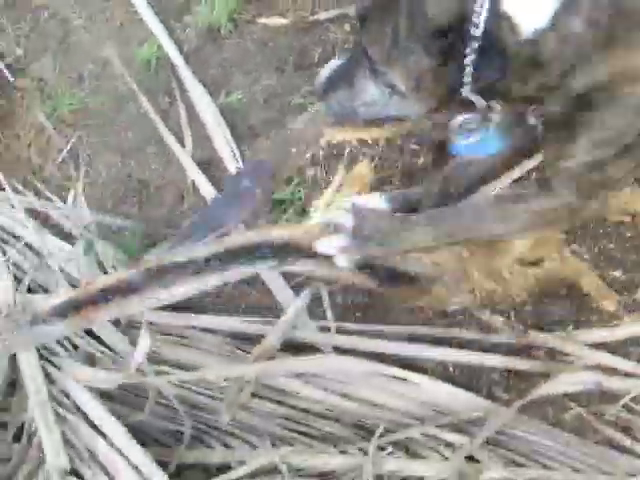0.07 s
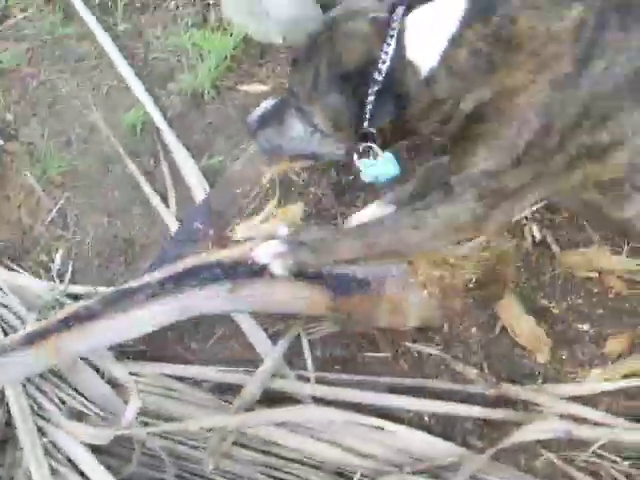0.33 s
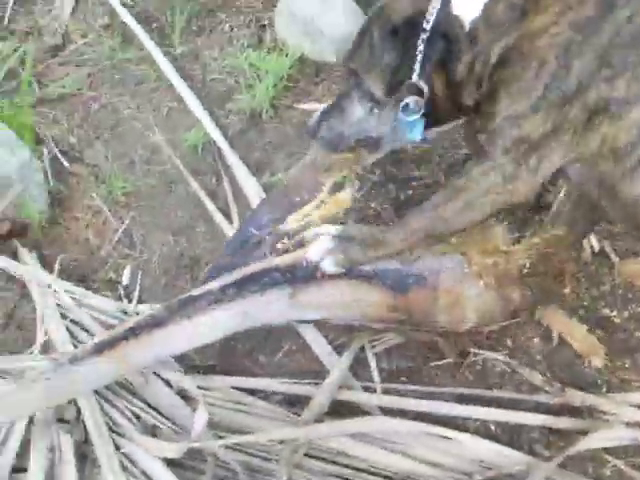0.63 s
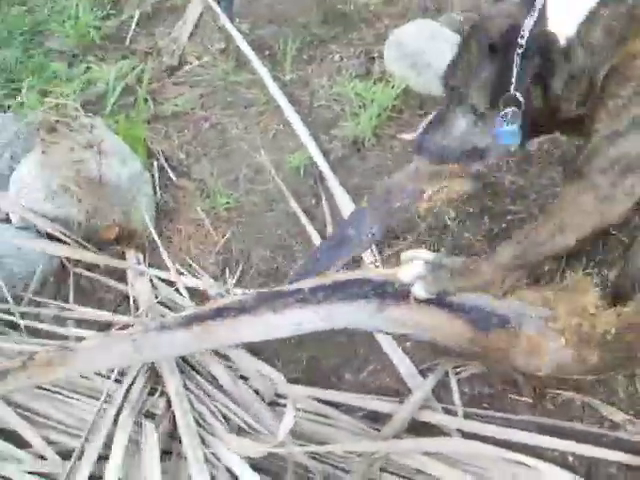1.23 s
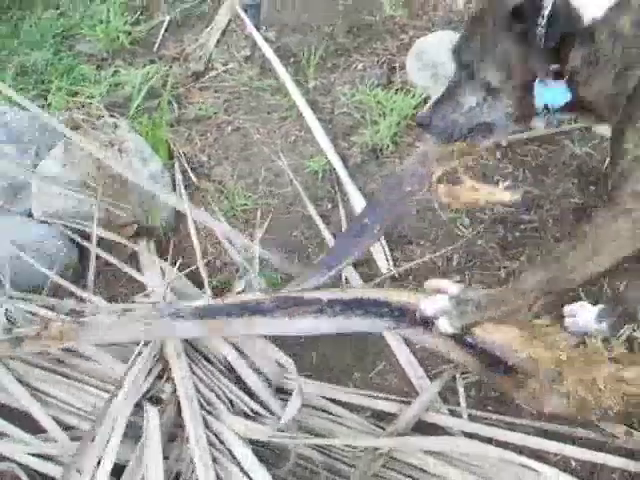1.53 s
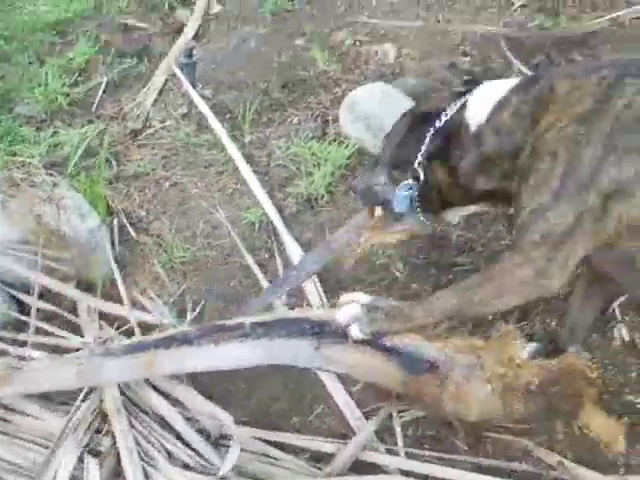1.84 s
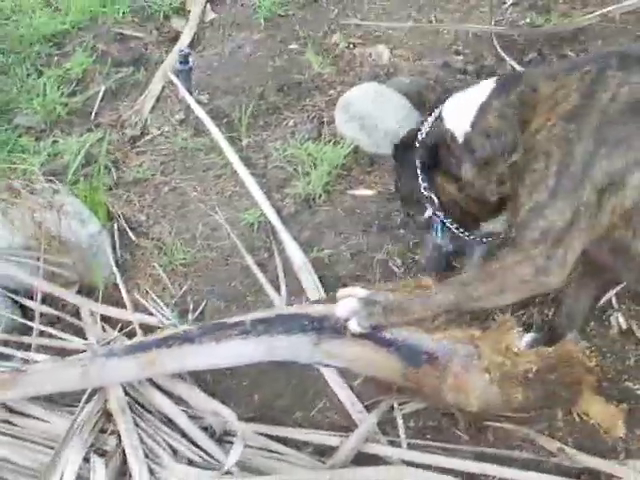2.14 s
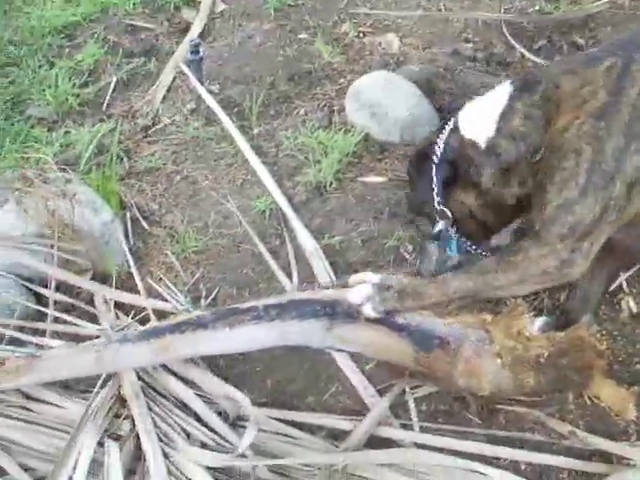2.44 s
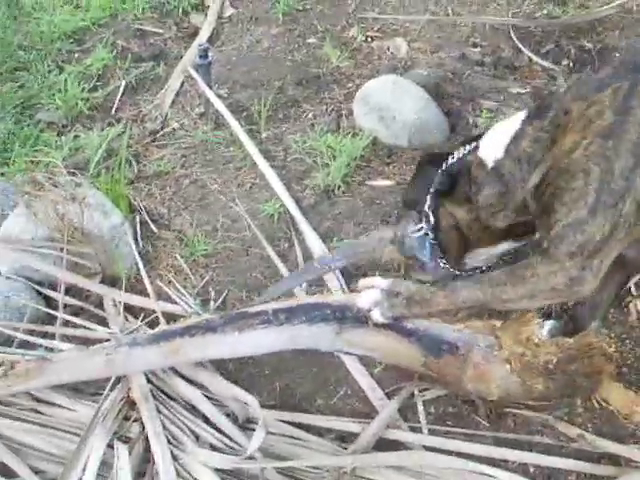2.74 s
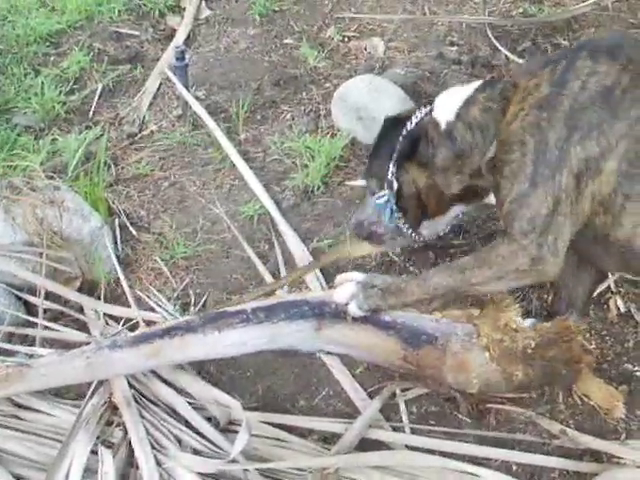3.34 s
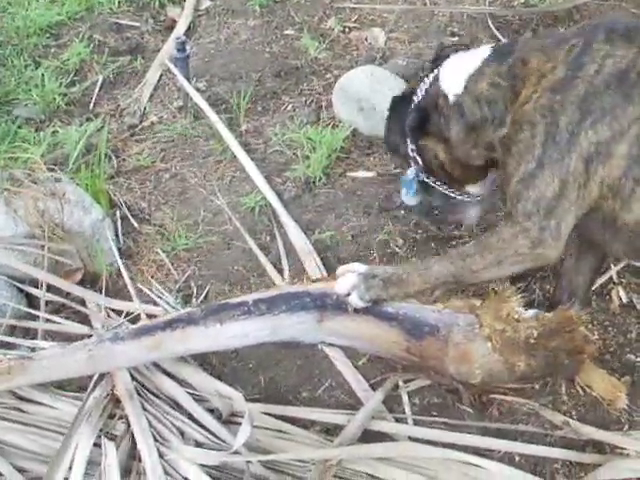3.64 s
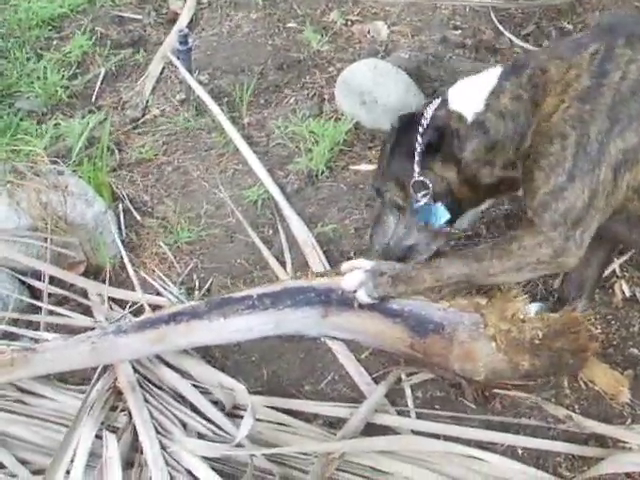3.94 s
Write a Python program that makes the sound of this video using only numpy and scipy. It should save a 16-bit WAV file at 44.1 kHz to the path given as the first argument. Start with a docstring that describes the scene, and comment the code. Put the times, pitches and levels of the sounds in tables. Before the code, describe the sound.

A dry palm frond rustles, crunches and snaps close up as a dog tugs it, with dull thuds and chain collar clinks. Strips rip off at about 0.9 and 1.4 seconds. From 2 seconds it is quieter, with sparse ticks and clinks over a distant outdoor hum. Faint birds call, one chirping near 3.1 seconds. Brief rustling and a sharp tick come around 3.5 seconds.

```python
"""Dry leaflets rustle and fibres crunch and snap, close up, as a dog tugs a palm frond over bare earth.
Two long strips rip off the stalk in dense runs of tiny fractures. Teeth and collar tick, the chain's
steel links ring and the scuffle thuds dully. Later a bird chirps once, with faint calls further off,
over a distant outdoor hum. One close microphone with a narrow band, the same in both channels."""
import sys
import numpy as np
from scipy import signal
from scipy.fft import rfft, irfft, next_fast_len
from scipy.io import wavfile
from scipy.ndimage import map_coordinates

SR = 44100
rng = np.random.default_rng(int(sys.argv[2]) if len(sys.argv) > 2 else 0)


def wrap_up_sound(samples):
    """Save the sound to the file named by the first command line argument, as 16-bit audio."""
    columns = np.atleast_2d(samples).T
    # keep every value between -1 and 1, then stretch to whole-number steps
    tamed = np.clip(columns, -1, 1)
    steps = np.round(tamed * 32767).astype(np.int16)
    wavfile.write(sys.argv[1], SR, steps)


N = 176400

# strips tearing off, one curve each (time [s], relative level [dB])
STRIP_RIPS = [
    [(.77, -42.5), (.826, -32), (.842, -25), (.89, -21), (.948, -24), (.958, -33), (1.0, -34)],
    [(1.36, -42.5), (1.415, -31.5), (1.44, -20), (1.46, -27), (1.485, -21.5), (1.505, -32), (1.54, -36)],
]
# leaflets dragging over the earth (time [s], level [dB])
LEAFLET_DRAG = [(0, -36.5), (.05, -36), (.16, -31), (.27, -34), (.31, -41.5), (.47, -39), (.66, -45),
                (.735, -40), (.8, -36.5), (1.0, -36.5), (1.19, -34.5), (1.24, -43), (1.32, -46.5),
                (1.4, -39), (1.54, -36.5), (1.67, -36), (1.96, -53), (2.97, -55.5), (3.18, -45.5),
                (3.48, -50), (3.55, -40), (3.73, -51), (4, -53.5)]
# bunches of fibres giving way (time [s], level [dB], hold [s])
BUNCH_BREAKS = [(0.027, -31, 0.0013), (0.053, -33, 0.017), (0.093, -28.5, 0.0066), (0.139, -29.5, 0.027),
                (0.177, -35.5, 0.004), (0.232, -35, 0.038), (0.88, -20.5, 0.0053), (1.063, -34, 0.011),
                (1.096, -38, 0.0053), (1.146, -29.5, 0.006), (1.177, -33.5, 0.009)]
# thick fibres snapping (time [s], relative level [dB], low ring [Hz], high ring [Hz])
FIBRE_SNAPS = [(0.0168, -18.5, 1480, 3000), (0.1125, -16.5, 3270, 5100), (0.477, -18.5, 2210, 4100),
               (0.5102, -24, 2110, 4540), (.617, -26, 1970, 3800), (0.7146, -28.5, 1950, 3240),
               (1.1477, -24, 2400, 5800), (3.2938, -29, 2910, 4780)]
# dry ticks of teeth and collar (time [s], relative level [dB])
HARD_TICKS = [(.096, -23.5), (0.37, -24.5), (.4402, -23.5), (0.7479, -21.5), (0.951, -14), (1.0982, -13),
              (1.2704, -25.5), (1.82, -28), (2.115, -27), (3.4358, -27), (3.5397, -15)]
# chain links touching, and at 3.812 s the tag's high overtone (time [s], level [dB], pitch [Hz])
COLLAR_RINGS = [(0.3281, -20.5, 6835), (0.45, -41, 6880), (0.537, -33, 7170), (0.578, -39, 6850),
                (0.613, -41.5, 6830), (0.706, -42, 6870), (1.258, -34, 6960), (2.494, -44.5, 7000),
                (2.812, -49, 6880), (3.041, -50, 6900), (3.51, -40, 7000), (3.812, -42, 7500),
                (3.89, -54, 6900), (3.969, -52, 7040)]
# the tag knocking on its ring (time [s], level [dB])
TAG_HITS = [(0.636, -29), (3.813, -40)]
# the stalk hitting the ground (time [s], level [dB])
STALK_KNOCKS = [(.12, -29.5), (.155, -41)]
# thuds of the scuffle (time [s], level [dB], pitch [Hz])
SCUFFLE_THUDS = [(0.181, -33, 92.5), (0.277, -35, 55), (.418, -33.5, 103), (.51, -34, 75.6),
                 (0.546, -30, 94.4), (.612, -30.5, 62), (.69, -31, 69), (0.743, -34, 95.5),
                 (0.936, -41, 74), (3.951, -39, 65)]
# low rumble at the microphone (time [s], level [dB])
RUMBLE_LEVEL = [(0, -60), (.55, -41), (1.05, -51.5), (2.1, -65.5), (3.4, -53), (4, -43.5)]
# the bird's falling note (time [s], pitch [Hz], level [dB])
BIRD_CHIRP = [(3.096, 5250, -58), (3.112, 5380, -49), (3.126, 5250, -42.5), (3.141, 4780, -43),
              (3.157, 4080, -47), (3.17, 3950, -53)]
# far-off calls (time [s], pitch [Hz], hold [s])
FAR_CALLS = [(2.73, 2600, 0.031), (2.795, 2570, 0.02), (3.681, 1724, 0.081)]
# colour of the tearing stalk (frequency [Hz], relative level [dB])
STALK_COLOUR = [(100, -15.5), (650, -15), (1200, -11), (1750, -3.5), (2300, -6), (3000, -3.5), (3700, -4.5),
                (6000, 0), (7000, -2.5), (8000, -4)]
# colour of scraping leaflets (frequency [Hz], relative level [dB])
LEAFLET_COLOUR = [(100, -26.5), (300, -8.5), (600, -9), (950, -4), (2100, 1), (3600, -0.5), (4600, 1.5),
                  (8000, 0.5)]
# colour of a breaking bunch (frequency [Hz], relative level [dB])
BUNCH_COLOUR = [(150, -16.5), (1000, -7), (2200, 2.5), (3500, -4), (6300, 4.5)]
# colour of a fibre's crack (frequency [Hz], relative level [dB])
CRACK_COLOUR = [(150, -22.5), (900, 0.5), (6000, 2.5), (10000, -29.0)]
# colour of the rumble (frequency [Hz], relative level [dB])
RUMBLE_COLOUR = [(25, 5.5), (58, 1.5), (110, -1), (200, -19.5), (1500, -81)]
# colour of the distant hum (frequency [Hz], relative level [dB])
HUM_COLOUR = [(40, 13.5), (170, -2.5), (290, 2), (550, -3), (900, 2.5), (1700, 0.5), (3300, -9),
              (8000, -15)]
# the microphone's treble roll-off (frequency [Hz], gain [dB])
MIC_RESPONSE = [(6900, 0), (7450, -7.5), (7950, -19), (8300, -32)]
TOP_HZ = 8250  # upper edge of the microphone's band


def rips():
    """Close to the microphone, each strip peels off the stalk in a dense run of fractures."""
    grain = fibres(count=30000, spread_db=2.5, ring_s=.0004) * amp(.8 * wobble(330))
    return amp(-1) * sum(level(rip) for rip in STRIP_RIPS) * unit(coloured(grain, STALK_COLOUR))


def rustle():
    """Leaflets scrape over each other: crackle on a soft hiss, catching and slipping."""
    grain = fibres(count=9000, spread_db=4.3, ring_s=.0003) + noise()
    catch = amp(1.5 * wobble(150))
    return level(LEAFLET_DRAG) * unit(coloured(grain * catch, LEAFLET_COLOUR))


def crunches():
    """Small bunches of fibres break together."""
    grain = fibres(count=20000, spread_db=3, ring_s=.0003) * amp(1.5 * wobble(500))
    force = sum(amp(db) * burst(s, attack=.00053, hold=hold, t60=.033) for s, db, hold in BUNCH_BREAKS)
    return force * unit(coloured(grain, BUNCH_COLOUR))


def snaps():
    """A thick fibre cracks, rings at two pitches for a moment, cracks again and splinters."""
    out = np.zeros(N)
    crack = amp(-3.5) * unit(coloured(noise(), CRACK_COLOUR))
    for s, db, low_hz, high_hz in FIBRE_SNAPS:
        ring = tone(s, low_hz) + tone(s, high_hz)
        snap = (ring + crack) * burst(s, attack=.0004, hold=.0013, t60=.006)
        splinters = crack * burst(s + .0028, attack=.00033, hold=.0011, t60=.0086)
        out += amp(db - 5.5) * (snap + splinters)
    return out


def ticks():
    """Teeth and collar tick: one hard contact, then a brief spray of splinters."""
    out = np.zeros(N)
    for s, db in HARD_TICKS:
        out[round(s * SR)] += amp(db + 11.5)
        out += amp(db - 2.5) * burst(s, attack=.0001, hold=0, t60=.017) * noise()
    return filtered(out, lambda hz: (hz < TOP_HZ) * 1j * hz / (3000 + 1j * hz))  # thin below 3 kHz


def collar():
    """Damped steel links ring high and set the chain shivering; the tag clinks, once with an overtone."""
    out = np.zeros(N)
    chain = noise_band(centre_hz=6880, half_width_hz=120)
    for s, db, hz in COLLAR_RINGS:
        ring = amp(db) * tone(s, hz) * burst(s, attack=.0004, hold=.0015, t60=.067)
        shiver = amp(db / 2 - 33.5) * chain * burst(s, attack=.003, hold=.021, t60=.13)
        out += ring + shiver
    for s, db in TAG_HITS:
        out += amp(db) * tone(s, hz=3744) * burst(s, attack=.0006, hold=.002, t60=.028)
    return out


def knocks():
    """The hollow stalk bumps the ground and bounces once, ringing in two modes."""
    return sum(amp(db) * tone(s, hz) * burst(s, attack=.0021, hold=0, t60=.044)
               for s, db in STALK_KNOCKS for hz in (222, 385))


def thuds():
    """The scuffle bumps for a cycle or two at a time, with a scuff above, over an uneven low rumble."""
    out = level(RUMBLE_LEVEL) * unit(coloured(noise(), RUMBLE_COLOUR))
    for s, db, hz in SCUFFLE_THUDS:
        scuff = amp(-10.5) * noise_band(centre_hz=155, half_width_hz=55)
        out += amp(db) * (tone(s, hz) + scuff) * burst(s, attack=.006, hold=1.1 / hz, t60=.066)
    return out


def bird(far_db=-52, sag_hz_per_s=900):
    """One thin, falling chirp, and three faint whistles further off that sag as they sound."""
    s, hz, db = np.transpose(BIRD_CHIRP)
    waver = 1 + .016 * wobble(660)
    out = level(np.transpose([s, db])) * whistle(np.interp(clock(), s, hz) * waver)
    for s, hz, hold in FAR_CALLS:
        pitch = hz - sag_hz_per_s * np.clip(clock() - s - hold / 2, -hold, hold)
        out += amp(far_db) * burst(s, attack=.01, hold=hold, t60=.059) * whistle(pitch * waver)
    return out


def yard(x):
    """The direct sound, then a faint short scatter from ground and stones."""
    tail = noise() * burst(.0036, attack=.00067, hold=0, t60=.12)
    return x + amp(-15) * signal.fftconvolve(x, tail / np.linalg.norm(tail))[:N]


def distant_hum():
    """The outdoors hums far behind the dog, almost steady."""
    return amp(-48 + .27 * wobble(6.99)) * unit(coloured(noise(), HUM_COLOUR))


def fibres(count, spread_db, ring_s):
    """Tiny fractures, each a brief ring at its own pitch; rms 1."""
    when, pitch, size, phase = rng.random((count, 4)).T
    t = np.arange(SR // 300) / SR
    hz = pitch[:, None] * TOP_HZ
    gain = amp(spread_db * -np.log(1 - .98 * size))  # many weak, a few strong
    grains = gain[:, None] * np.sin(2 * np.pi * (hz * t + phase[:, None])) * np.exp(-t / ring_s)
    at = (when * N).astype(int)[:, None] + np.arange(len(t))
    return unit(np.bincount(at.ravel(), grains.ravel(), N)[:N])


def amp(db):
    """Decibels to gain."""
    return 10 ** (np.asarray(db) / 20)


def unit(x):
    """Scale to rms 1."""
    return x / np.sqrt(np.mean(x ** 2) + 1e-20)


def clock():
    """Time of each sample in seconds."""
    return np.arange(N) / SR


def level(rows):
    """Gain per sample from (time [s], level [dB]) rows, silent outside them."""
    s, db = np.transpose(rows)
    return amp(np.interp(clock(), s, db, left=-120, right=-120))


def wobble(rate):
    """A smooth random curve, rate knots a second."""
    return map_coordinates(rng.standard_normal(4096), [clock() * rate], mode="wrap")


def burst(s, attack, hold, t60):
    """Envelope that rises at s, holds, then falls 60 dB in t60; all in seconds."""
    t = np.maximum(clock() - s, 0)
    decay = np.log(1000) * np.maximum(t - hold, 0) / t60
    return (1 - np.exp(-t / attack)) * np.exp(-np.minimum(decay, 20))


def tone(s, hz):
    """A sine with zero phase at time s."""
    return np.sin(2 * np.pi * hz * (clock() - s))


def whistle(hz):
    """A sine that follows a pitch curve."""
    return np.sin(2 * np.pi * np.cumsum(hz) / SR)


def noise():
    """White noise."""
    return rng.standard_normal(N)


def noise_band(centre_hz, half_width_hz):
    """Noise around one resonance; rms 1."""
    return unit(filtered(noise(), lambda hz: 1 / (1 + ((hz - centre_hz) / half_width_hz) ** 2)))


def filtered(x, response):
    """x through a frequency response."""
    size = next_fast_len(N + SR // 4)
    return irfft(rfft(x, size) * response(np.fft.rfftfreq(size, 1 / SR)), size)[:N]


def coloured(x, points):
    """x through (frequency [Hz], gain [dB]) points on a log frequency axis."""
    f, db = np.transpose(points)
    return filtered(x, lambda hz: amp(np.interp(np.log(hz + 1), np.log(f), db)))


def scene():
    """Dog and frond up close, bird and hum beyond, all into one microphone."""
    bright = rustle() + rips() + crunches() + snaps() + ticks() + collar() + bird()
    mono = yard(bright) + knocks() + thuds() + distant_hum()
    return np.array([mono, mono])


def record(dry):
    """The microphone rolls off the treble and keeps nothing above its band limit."""
    return np.array([filtered(coloured(x, MIC_RESPONSE), lambda hz: hz < TOP_HZ) for x in dry])


dry = scene()
out = record(dry)
wrap_up_sound(out)
```